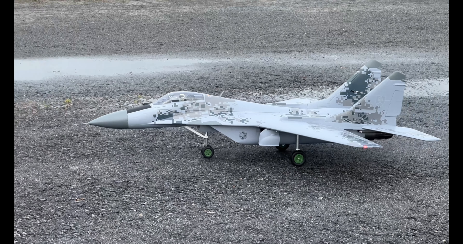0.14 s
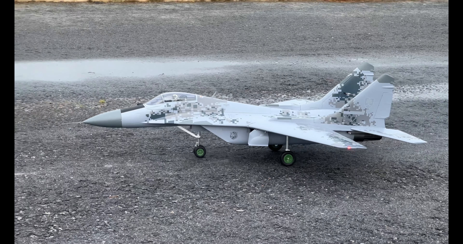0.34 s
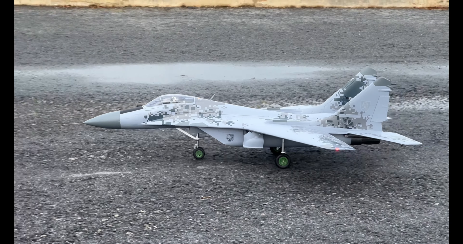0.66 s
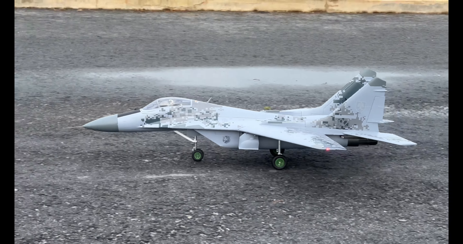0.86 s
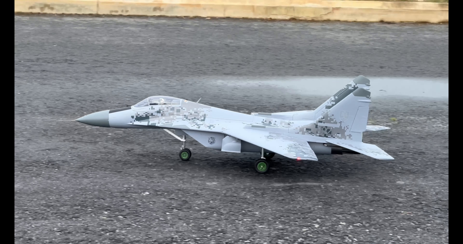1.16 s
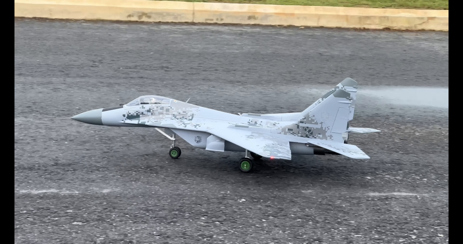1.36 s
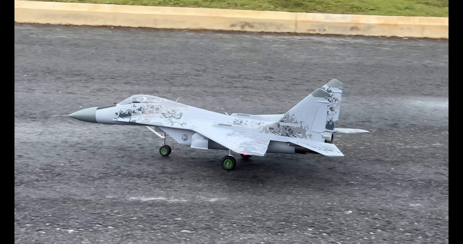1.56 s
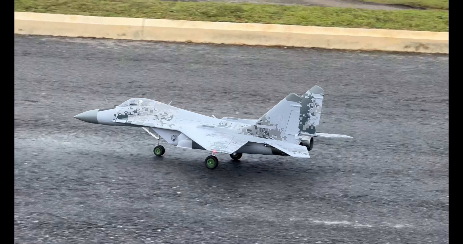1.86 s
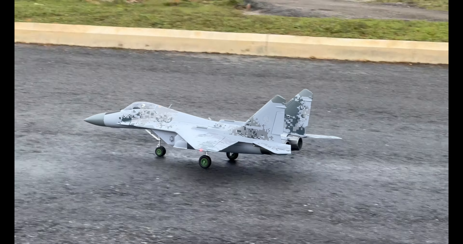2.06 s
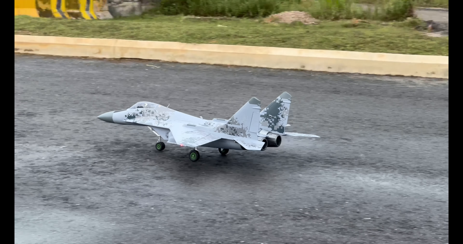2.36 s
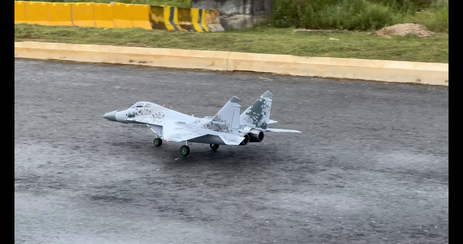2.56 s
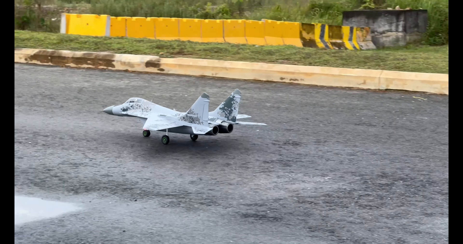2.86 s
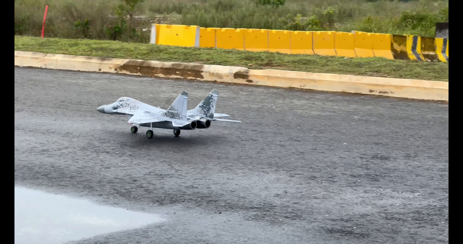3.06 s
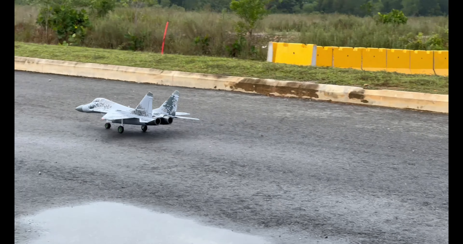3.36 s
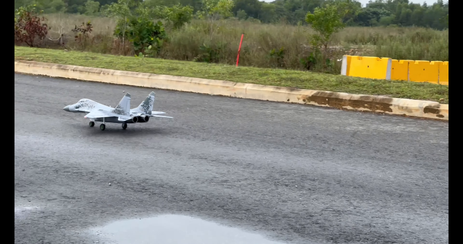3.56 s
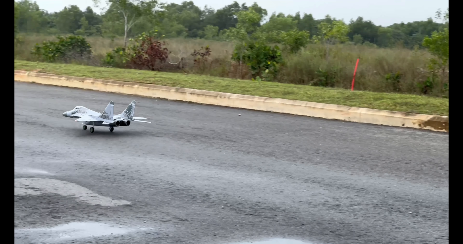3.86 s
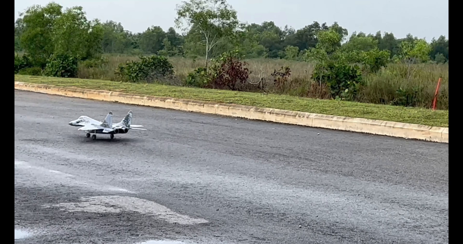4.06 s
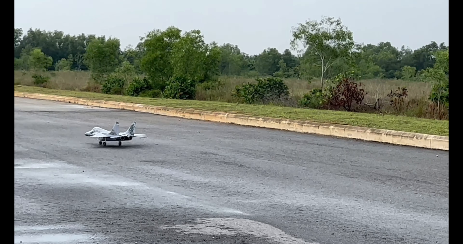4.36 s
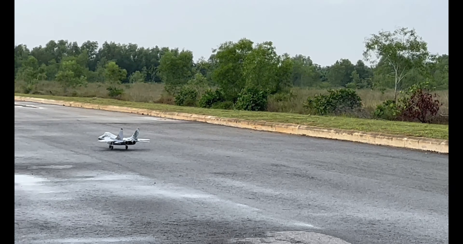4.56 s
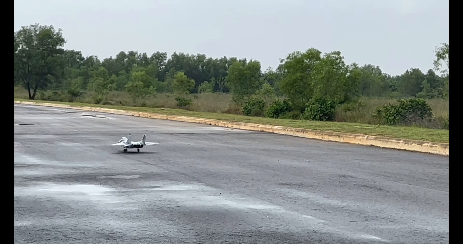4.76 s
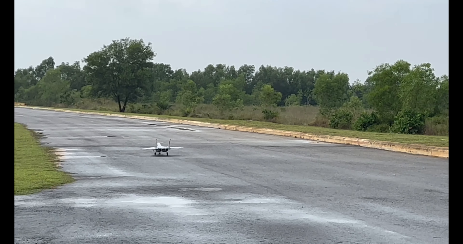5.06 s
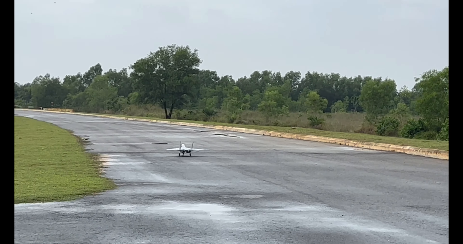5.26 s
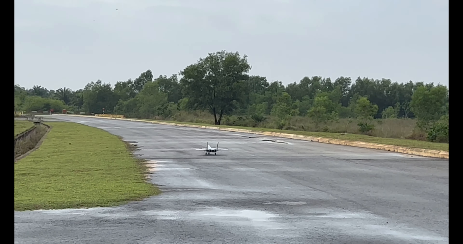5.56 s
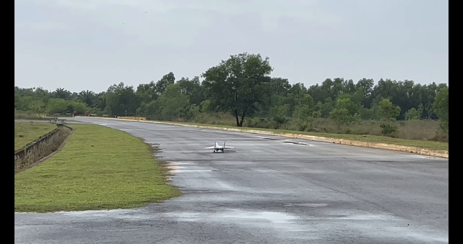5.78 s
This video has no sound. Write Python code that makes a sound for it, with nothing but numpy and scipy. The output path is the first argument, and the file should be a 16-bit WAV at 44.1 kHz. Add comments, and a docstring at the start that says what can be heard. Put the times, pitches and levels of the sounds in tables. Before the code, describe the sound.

A model jet's twin electric fans whine loudly, climbing in steps over rushing air as it passes and rolls away.

```python
"""Two electric ducted fans whine as a model jet accelerates past on an outdoor runway and rolls away.
Each fan sings at its blade rate, climbing with the throttle in steps; Doppler shift pulls it back a little.
The exhaust roars and hisses, with an echo off the asphalt, and the airflow rings the ducts.
Each layer swells and fades as the jet passes; late on, the whine throbs twice and a drone comes through.
Underneath, a little wind buffets the two ports of the microphone."""
import sys
import numpy as np
from scipy.fft import rfft, irfft
from scipy.io import wavfile

SR = 44100
rng = np.random.default_rng(int(sys.argv[2]) if len(sys.argv) > 2 else 0)


def generate_wav(sig):
    """Save sig (samples, or channels by samples) to the path in sys.argv[1] as 16-bit PCM at SR."""
    pcm = np.round(np.clip(np.atleast_2d(sig).T, -1, 1) * 32767).astype(np.int16)
    wavfile.write(sys.argv[1], SR, pcm)


N = 261072
TIME = np.arange(N) / SR
FREQS = np.maximum(np.fft.rfftfreq(N, 1 / SR), 1)

# Opening blade rates in Hz, before Doppler shift: the leading fan, then the lagging fan.
START_BLADE_HZ = (3315, 3025)
# Throttle steps. Each row: start in seconds, spool-up in seconds, new leading and lagging rates in Hz.
THROTTLE_STEPS = [(.22, .15, 3650, 3285), (.58, .08, 3745, 3355), (1.03, .07, 3822, 3410),
                  (1.27, .15, 3935, 3505), (1.54, .14, 4122, 3625), (2.18, .09, 4312, 3742),
                  (2.54, .1, 4437, 3816), (2.75, .17, 4550, 3895), (3.24, .24, 5290, 4320),
                  (3.48, .17, 5539, 4530), (3.7, .34, 5539, 5520)]
# The jet's heading. Each row: time in seconds, nose-to-listener angle in degrees (90 side on, 180 tail on).
ASPECT_ANGLE = [(0, 75), (1.2, 90), (3, 138), (5, 170), (5.92, 176)]
# The getaway. Each row: time in seconds, speed away from the listener in m/s.
RECEDING_SPEED = [(0, 0), (1.65, 0), (2.2, 3), (3.6, 6), (4.6, 12.65), (5.05, 17.7), (5.92, 21)]
# The whole jet's fade into the distance. Each row: time in seconds, gain in dB.
DISTANCE_FADE = [(4.6, 0.5), (4.8, -0.7), (5.05, 0), (5.38, -5), (5.75, -3), (5.92, -4.5)]

# Swells: moments when the whine grows louder, including two brief late throbs on the leading fan that
# stand for the fans beating together. One list per partial.
# Each row: aspect angle at the peak in degrees, half-width in degrees, relative level in dB.
LEADING_FAN_SWELLS = [
    [(78.8, 1, -23.5), (82.7, 1.5, -21.5), (87.2, 1, -22.5), (105, 3, -21.5), (121, 7, -26),
     (138, 2.2, -26), (146, 2.8, -24.5), (155, 4, -24), (163.6, 1, -19), (170.2, .5, -22), (175, 2, -25),
     (150, 50, -32)],
    [(81, 1.4, -24), (88, 7, -38), (153, 12, -33.5)],
    [(93, 6, -35), (126, 10, -32), (143.4, 1, -23)],
]
LAGGING_FAN_SWELLS = [
    [(76.5, 2.3, -22.5), (100, 22, -30.5), (151.8, 1.5, -28), (155, 18, -33)],
    [(84, 10, -36.5), (106, 3.5, -27.5)],
    [(122, 14, -26.5)],
]
# Lobes of the noise layers, which swell as they sweep over the listener. The ducts have one list per note.
# Each row: aspect angle in degrees, half-width in degrees, relative level in dB.
BLADE_WASH_LOBES = [(92.1, 8.8, -20.5), (110, 12, -24), (161.5, 8.1, -18), (175.3, 2.9, -21.5)]
HISS_BEAM_LOBES = [(144.3, 5.9, -21.5)]
EXHAUST_ROAR_LOBES = [(103, 63, -18), (158, 18, -18)]
EXHAUST_RUSH_LOBES = [(77.5, 10, -23.5), (114.7, 36, -21), (165, 19.5, -20)]
EXHAUST_HISS_LOBES = [(99.6, 29.5, -19.5), (131.1, 14, -16.5), (176.6, 23, -25)]
EXHAUST_SIZZLE_LOBES = [(123.6, 33, -19), (150.3, 4.3, -16.5), (156.7, 2.7, -17.5), (176, 3.5, -31)]
DUCT_RING_LOBES = [
    [(71, 12, -18.5), (102, 38, -27)],
    [(74, 10, -13), (111, 38, -22)],
    [(95.5, 12.4, -17.5), (126.4, 12.3, -23.5)],
    [(89.3, 9.7, -20.5), (135, 27, -23)],
    [(85.7, 5.7, -20), (98.6, 3.6, -17), (139.3, 18.7, -19)],
    [(83.4, 12, -26), (147, 21, -24), (167.5, 2.6, -20)],
]
HOLLOW_DRONE_LOBES = [(154, 4.6, -22), (170, 7.9, -22.5)]

# The exhaust's four noise bands, dark to bright. Each row: frequency in Hz, relative level in dB.
ROAR_SPECTRUM = [(60, -7), (150, -3), (240, 0.5), (500, 3), (750, 2), (1200, 3), (1500, 0.5), (2000, -1),
                 (2600, -13), (5000, -18.5)]
RUSH_SPECTRUM = [(1200, -20), (2200, -1), (3000, -1), (4200, -4), (5500, -13), (8000, -43)]
HISS_SPECTRUM = [(2800, -12), (4200, -6.5), (5200, -0.5), (6400, 0), (7400, -1), (8000, -12.5),
                 (9500, -8.5), (13000, -52)]
SIZZLE_SPECTRUM = [(6000, -40), (8000, -3), (9500, -4), (11500, 6), (13000, 1.5), (15800, -1.5)]
# The bounce off the asphalt. Each row: time in seconds, delay in milliseconds, echo gain in dB.
GROUND_ECHO = [(0, 0.29, -11), (.9, 0.19, -8), (1.4, 0.18, -7.5), (2.0, 0.21, -5), (3.0, 0.17, -9.5),
               (4.2, 0.053, -26), (5.4, 0.13, -4), (5.92, 0.07, -10)]
# The ducts' notes. Each row: pitch in Hz, width in Hz, aspect angle in degrees past which the note sinks,
# pitch in Hz when tail on.
DUCT_RESONANCES = [(299.1, 102, 75, 230), (386.8, 95, 130, 335), (412.3, 43, 135, 365),
                   (593.5, 76, 118, 500), (930, 115, 131, 735), (1851, 240, 75, 1240)]
# The drone's fixed notes. Each row: pitch in Hz, width in Hz, relative level in dB.
DRONE_RESONANCES = [(372, 50, -5), (587, 22, 0), (890, 40, -4)]

# Wind rumble on the microphone. Each row: frequency in Hz, relative level in dB.
WIND_SPECTRUM = [(18, -32), (32, -22), (48, -2.5), (62, 0), (85, -3), (120, -9.5), (200, -19.5), (500, -40)]
# Gusts over the breeze. Each row: midpoint in seconds, length in seconds, level in dB.
WIND_GUSTS = [(.8, 2.0, -33), (1.37, .24, -23), (1.98, .28, -14), (2.42, .15, -29.5), (4.57, .14, -30),
              (5.17, .1, -29.5), (5.4, 1.8, -35)]
# Stereo width. Each row: frequency in Hz, level of side against mid in dB.
SIDE_SPECTRUM = [(30, -19), (130, -9), (300, -24), (600, -19.5), (1500, -29.5), (2600, -29), (3300, -8),
                 (4400, -41), (8000, -85), (15000, -5)]
# Phase between the microphone's ports. Each row: frequency in Hz, shift of the right port in radians.
RIGHT_PORT_PHASE = [(2700, 0), (3360, -.6), (4300, 0), (8500, 0), (9200, 1.7), (10120, 3.14), (12000, 6.28),
                    (13800, 9.42), (15300, 12.5), (16000, 12.7)]


def fan_whine(blade_hz, partial_swells, gain_db):
    """Blade-rate whine: uneven inflow shakes its pitch, and each partial flutters more through more air."""
    away_m = np.cumsum(curves(RECEDING_SPEED)[0]) / SR
    flutter_db = 2.5 + .1 * away_m
    phase = turn(blade_hz * (1 + .0012 * wander(45)))
    whine = 0
    for harmonic, swells in enumerate(partial_swells, 1):
        flutter = undb(flutter_db * (wander(24) - flutter_db / 10))  # the offset steadies the mean power
        whine += swell_gain(swells) * flutter * np.sin(harmonic * phase)
    return np.sqrt(2) * undb(gain_db) * whine


def blade_rates():
    """The fans spool up with the throttle and hold; Doppler shift lowers them as the jet speeds away."""
    hz = held_hz = np.array(START_BLADE_HZ)[:, None]
    for start, spool_s, *rates in THROTTLE_STEPS:
        target_hz = np.array(rates)[:, None]
        hz = hz + (target_hz - held_hz) * np.clip((TIME - start) / spool_s, 0, 1)
        held_hz = target_hz
    mach = curves(RECEDING_SPEED)[0] / 343
    return hz / (1 + mach)


def blade_noise(blade_hz):
    """Turbulence chopped by the blades follows their rate; a higher hiss shoots out in a narrow beam."""
    wash = resonance(1.01 * blade_hz, width_hz=1310) * swell_gain(BLADE_WASH_LOBES)
    beam = resonance(8700, width_hz=1600) * swell_gain(HISS_BEAM_LOBES)
    return wash + beam


def exhaust():
    """Mixing noise of the jets: large eddies roar, small ones at the nozzle hiss; all surge together."""
    surge_db = .49 * wander(8.9)
    roar = noise(ROAR_SPECTRUM) * swell_gain(EXHAUST_ROAR_LOBES) * undb(.5 * wander(36))
    rush = noise(RUSH_SPECTRUM) * swell_gain(EXHAUST_RUSH_LOBES) * undb(.79 * wander(15))
    hiss = noise(HISS_SPECTRUM) * swell_gain(EXHAUST_HISS_LOBES) * undb(.7 * wander(21))
    sizzle = noise(SIZZLE_SPECTRUM) * swell_gain(EXHAUST_SIZZLE_LOBES) * undb(.5 * wander(14))
    return (roar + rush + hiss + sizzle) * undb(surge_db)


def ground_bounce(direct):
    """A dull echo off rough asphalt joins the direct sound and carves a moving hollow into it."""
    lag_ms, echo_db = curves(GROUND_ECHO)
    dull = low_pass(direct, cutoff_hz=5000)
    return direct + undb(echo_db) * np.interp(TIME - lag_ms / 1000, TIME, dull)


def ducts():
    """The airflow blows the two ducts like wide pipes; their notes sink as the jet turns its tail."""
    aspect, = curves(ASPECT_ANGLE)
    ring = 0
    for (hz, width_hz, knee_deg, tail_hz), lobes in zip(DUCT_RESONANCES, DUCT_RING_LOBES):
        centre_hz = np.interp(aspect, [knee_deg, 180], [hz, tail_hz])
        ring += resonance(centre_hz, width_hz) * swell_gain(lobes)
    return ring


def drone():
    """A hollow tone at fixed pitches that comes through as the jet recedes."""
    notes = sum(undb(db) * resonance(hz, width_hz) for hz, width_hz, db in DRONE_RESONANCES)
    return unit(notes) * swell_gain(HOLLOW_DRONE_LOBES)


def wind(breeze_db):
    """A breeze rumbles on the microphone; each gust swells, holds and drops."""
    gust_power = sum(undb(db) ** 2 / (1 + (2 * (TIME - middle) / length) ** 10)
                     for middle, length, db in WIND_GUSTS)
    return noise(WIND_SPECTRUM) * np.sqrt(undb(breeze_db) ** 2 + gust_power)


def swell_gain(swells):
    """A layer's level ride: bell-shaped swells, cued by aspect angle, add in power and fade with distance."""
    aspect, = curves(ASPECT_ANGLE)
    power = sum(undb(db) ** 2 * np.exp(-((aspect - centre) / width) ** 2) for centre, width, db in swells)
    return np.sqrt(power) * undb(curves(DISTANCE_FADE)[0])


def resonance(hz, width_hz):
    """Turbulence ringing a resonance whose centre may glide; rms 1."""
    skirt = 1 / np.sqrt(1 + (2 * FREQS / width_hz) ** 4)
    in_phase, quadrature = irfft(rfft(rng.standard_normal((2, N))) * skirt, N)
    phase = turn(hz)
    return unit(in_phase * np.cos(phase) + quadrature * np.sin(phase))


def noise(spectrum):
    """Coloured noise of rms 1."""
    return unit(irfft(rfft(rng.standard_normal(N)) * eq_curve(spectrum), N))


def wander(rate_hz):
    """Smooth random modulation of rms 1 that moves about rate_hz times a second."""
    return unit(low_pass(rng.standard_normal(N), rate_hz))


def low_pass(x, cutoff_hz):
    """Roll off the highs at 24 dB per octave."""
    return irfft(rfft(x) / (1 + (FREQS / cutoff_hz) ** 4), N)


def eq_curve(points):
    """Gain at each frequency from points in Hz and dB."""
    hz, db = np.transpose(points)
    return undb(np.interp(np.log(FREQS), np.log(hz), db))


def curves(table):
    """Automation lanes: each column after the first, joined by straight lines in time."""
    seconds, *columns = np.transpose(table)
    return [np.interp(TIME, seconds, column) for column in columns]


def turn(hz):
    """Running phase of a pitch that may glide."""
    return 2 * np.pi * np.cumsum(hz * np.ones(N)) / SR


def undb(db):
    """Decibels to gain."""
    return 10 ** (np.asarray(db) / 20)


def unit(x):
    """Scale to rms 1."""
    return x / np.sqrt(np.mean(x ** 2))


def scene():
    """The jet stays straight ahead; scatter from the ground and trees adds a little stereo width."""
    leading_hz, lagging_hz = blade_rates()
    whine = fan_whine(leading_hz, LEADING_FAN_SWELLS, gain_db=2.5)
    whine += fan_whine(lagging_hz, LAGGING_FAN_SWELLS, gain_db=2.4)
    jet = whine + ground_bounce(exhaust()) + ducts() + blade_noise(leading_hz) + drone()
    mid = jet + wind(breeze_db=-34)
    scatter = unit(rng.standard_normal(N) * np.exp(-TIME / .06)) / np.sqrt(N)  # a short diffuse tail
    side = irfft(rfft(mid) * rfft(scatter) * eq_curve(SIDE_SPECTRUM), N)
    return np.array([mid + side, mid - side])


def record(dry):
    """The two ports part in phase mainly in the top octave; the left is a touch louder; the top is cut."""
    phase = np.interp(FREQS, *np.transpose(RIGHT_PORT_PHASE))
    left, right = rfft(dry)
    ports = np.array([left * undb(-2.28), right * undb(-2.5) * np.exp(1j * phase)])
    high_cut = 1 / np.sqrt(1 + (FREQS / 15800) ** 400)  # brick wall at 15.8 kHz
    return irfft(ports * high_cut, N)


dry = scene()
out = record(dry)
generate_wav(out)
```